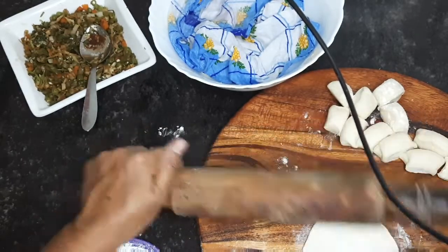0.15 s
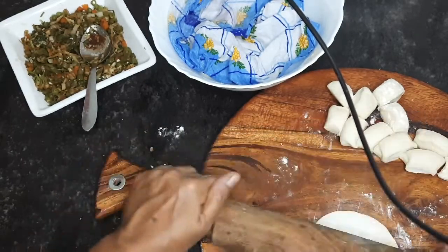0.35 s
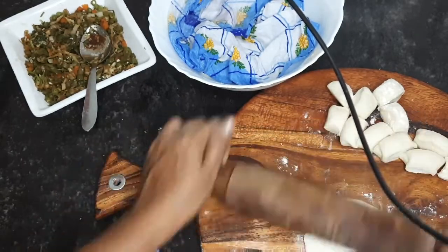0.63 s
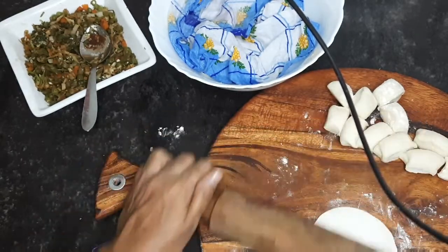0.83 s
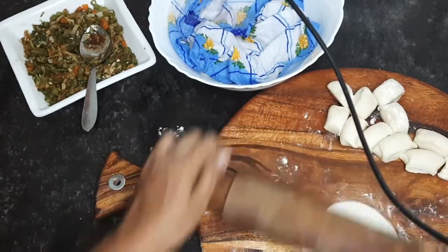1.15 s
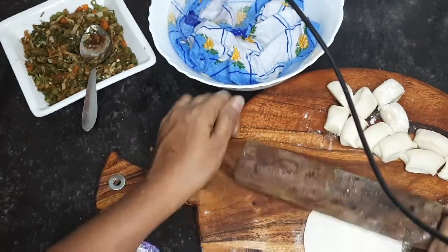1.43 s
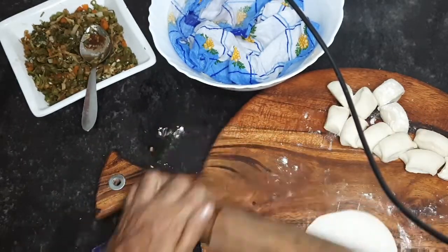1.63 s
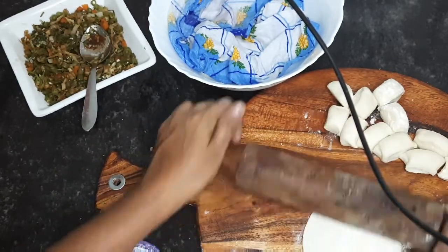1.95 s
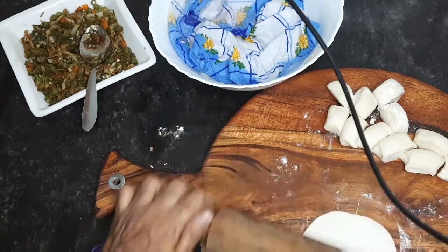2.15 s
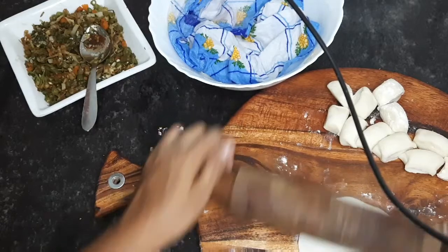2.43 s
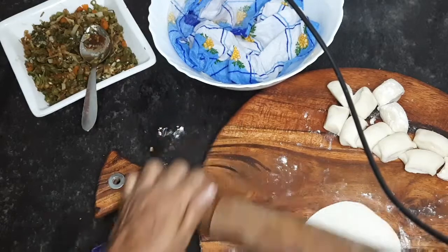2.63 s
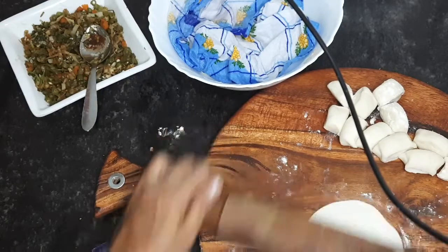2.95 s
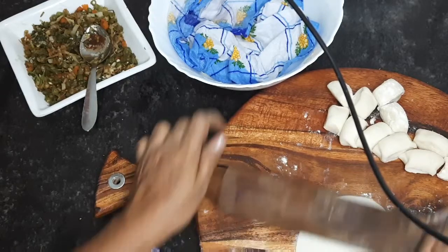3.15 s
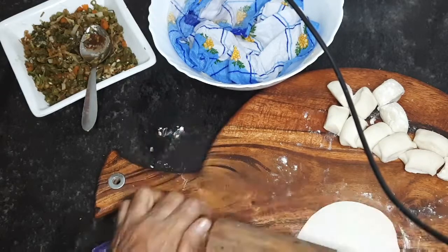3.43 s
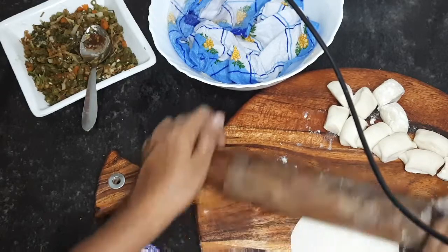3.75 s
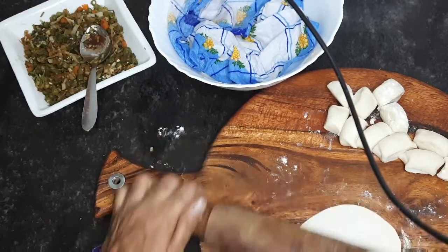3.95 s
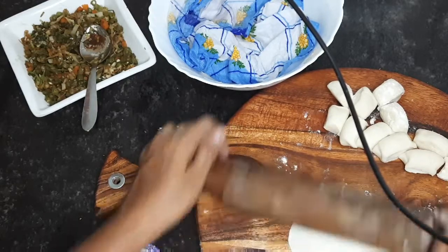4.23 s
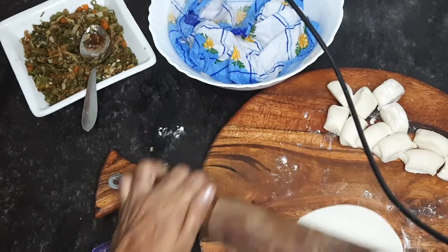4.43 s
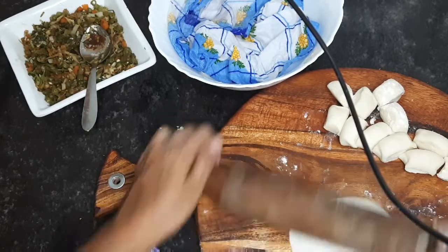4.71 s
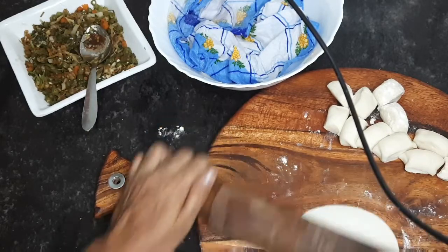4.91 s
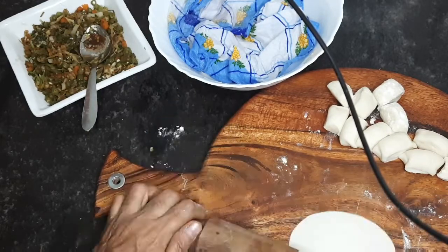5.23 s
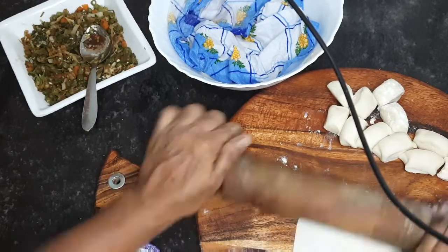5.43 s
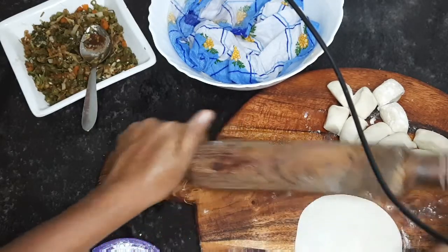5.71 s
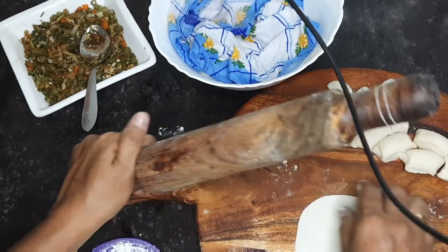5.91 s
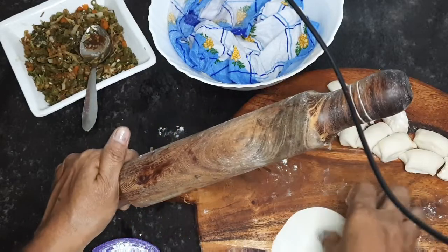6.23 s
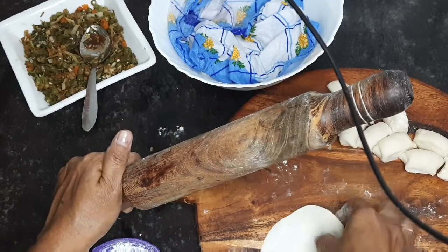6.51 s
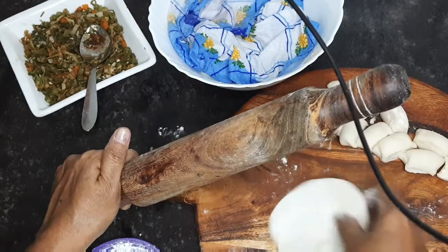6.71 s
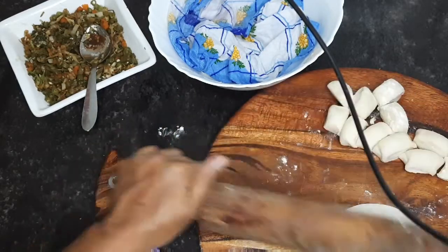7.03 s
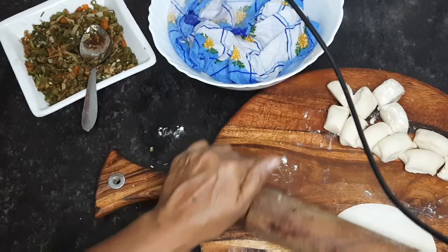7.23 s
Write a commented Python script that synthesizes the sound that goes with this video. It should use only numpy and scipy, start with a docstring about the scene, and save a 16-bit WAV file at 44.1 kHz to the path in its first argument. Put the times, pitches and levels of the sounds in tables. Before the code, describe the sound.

Close up on a kitchen counter, a heavy wooden pin knocks and rumbles across a board about every half second, with low thuds beneath and palms hissing on the handles. It is loudest in the first four seconds, then softer. Near the end only light dough handling remains over faint room noise, before one last swish.

```python
"""First come a few faint knocks and a soft rustle of hands; then a wooden rolling pin runs to and fro over dough.
It rolls on a wooden board on a kitchen counter, close to a stereo microphone. Knocks, as the pin drops off
the dough, are decaying tones of the wood; its rumble over bare wood is the same tones tapped at random,
above a low noise thud. Floury palms on the handles are shaped noise plus a hollow note.
At the end fingers slide and turn the dough. The kitchen answers the wood, over a steady room tone."""
import sys
import numpy as np
from scipy import signal
from scipy.io import wavfile
from scipy.ndimage import uniform_filter1d

SR = 44100
rng = np.random.default_rng(int(sys.argv[2]) if len(sys.argv) > 2 else 0)


def persist_wave(psi):
    """Save psi, clipped to +-1, as 16-bit WAV."""
    counts = np.round(np.clip(psi, -1, 1) * 32767).astype(np.int16)
    wavfile.write(sys.argv[1], SR, np.atleast_2d(counts).T)


N = 325017

# Blows of pin on board: t/s, peak level/dB, low tones/dB, high tones/dB, lean of the middle tones/(dB per octave)
KNOCKS = [(0.018, -40.5, 15, 21, 0.1), (0.078, -32, -5, -4, 47), (0.176, -30, -11, -3, 51),
          (0.574, -16, -3, -10, 17.5), (0.688, -3.5, -5, -19.5, -13), (1.041, -8, -11, -9.5, 16),
          (1.108, -4.5, -7, -12, -10.5), (1.473, -1.5, -12.5, -3.5, 13.5), (1.555, -28.5, -10.5, -8.5, 0.5),
          (1.884, 2.5, -8, -1.5, 13.5), (1.918, -19.5, -11, 2, 2.5), (1.982, -25, -14, -2, -6),
          (2.344, -3, -4.5, -5.5, 18.5), (2.665, -29, -7, 4, -2), (2.8, -3, -13, -3, 9),
          (2.853, -18, -9, 2.5, -2), (3.134, -35.5, -14.5, 5.5, -11.5), (3.259, -3.5, -7, -2.5, -18),
          (3.287, -23.5, -9, 2.5, -4), (3.621, -35, -8.5, 5, -6), (3.639, -19, -4.5, -8.5, -6),
          (3.731, -5.5, -7, -4.5, 4), (4.273, -25.5, -3, -22, 1), (4.738, -20, -24, -10, -12),
          (5.052, -13, -3.5, -1, -8), (5.18, -40, -9, -8, -19), (5.517, -18, -3.5, -15.5, 4),
          (5.585, -35, -6, -12, 4), (5.605, -24.5, -6, -15, 4), (5.63, -16, 8.5, -26, -19),
          (7.006, -48, -4, -12, 26)]
# Tones (modes) of board and pin: f/Hz, relative level/dB, time to die by 60 dB/s,
# phase by which the left channel leads/radians, left over right/dB
WOOD = [(320.4, -8, 0.11, .1, -0.2), (364.3, -6.5, 0.093, 0.063, 0.5), (452.6, -4.5, 0.037, .1, 1.7),
        (580, -6.5, .08, 0.054, 4.5), (623.7, 2.5, 0.06, .1, -3), (755, 3.5, 0.087, 0.074, 2),
        (780.5, 6, 0.016, 0.22, -3.5), (850, 3.5, 0.018, 0.69, 9.5), (930, -4.5, 0.023, 0.35, -10),
        (950, -9, 0.058, 0.13, -5.5), (1138, -8.5, 0.17, 1, 5.5), (1206, -2, 0.028, 0.47, -3.5),
        (1300, 0, 0.0086, 1.8, 9.5), (1451, -9.5, 0.11, 0.49, 3), (1567, -7.5, 0.041, 1.3, -6.5),
        (1618, -10, 0.2, 0.23, 2), (1680, -7, 0.14, 3.3, -11.5), (1854, -0.5, 0.027, 5.1, 6.5),
        (2165, -7.5, 0.067, 1.5, -1.5), (2494, -11, 0.038, 1.4, -4), (2543, -15.5, 0.072, 2.5, -1.5),
        (2701, -12.5, 0.05, 1.9, -4), (2864, -19.5, 0.017, 2.9, -14.5), (3350, -15, 0.011, 5.4, -7.5)]
LOW_BELOW_HZ, HIGH_ABOVE_HZ = 520, 1050
# The high tones come in close pairs, so they are listed twice
MODES_PAIRED = WOOD + [mode for mode in WOOD if mode[0] > HIGH_ABOVE_HZ]
# Runs of the pin on bare wood: full contact t/s, length of contact/s, rumble level/dB, counter thud level/dB
RUNS = [(0.57, 0.078, -49.5, -48.5), (0.702, .05, -35.5, -54.5), (1.051, 0.13, -33.5, -55),
        (1.492, 0.084, -30.5, -57), (1.891, 0.092, -33, -52), (2.352, 0.067, -30.5, -52),
        (2.679, 0.04, -38.5, -74.5), (2.816, 0.11, -31.5, -52.5), (3.143, 0.04, -41, -67.5),
        (3.263, 0.13, -32, -53.5), (3.64, 0.055, -45, -53.5), (3.742, 0.11, -32, -53),
        (4.266, 0.0089, -40, -66), (4.729, 0.027, -41.5, -59), (5.055, 0.13, -42.5, -56),
        (5.528, 0.048, -45.5, -60), (5.624, 0.056, -43.5, -64)]
# Colour of the thud through the counter: f/Hz, relative level/dB
THUD = [(30, -26.0), (60, -18.0), (86, 5.0), (107, 8.0), (135, -17.5), (190, -6), (260, -27.0), (600, -78.0)]
# Palms on handles, later fingers on dough: fastest t/s, speeding up/s, slowing down/s, hiss level/dB, hollow note level/dB
SLIDES = [(.03, 0.021, 0.043, -64.5, -56), (0.084, 0.011, 0.052, -61.5, -46),
          (0.189, 0.023, 0.095, -52, -50), (.6, 0.035, 0.16, -57, -40.5), (.74, 0.13, 0.25, -51, -57),
          (.958, 0.068, 0.08, -49, -58.5), (1.14, 0.092, 0.12, -47.5, -47), (1.38, 0.093, 0.1, -47.5, -50),
          (1.58, 0.11, 0.11, -45.5, -47), (1.83, 0.076, 0.11, -44.5, -48.5),
          (2.01, 0.13, .13, -45.5, -43.5), (2.27, 0.069, .08, -45, -44.5), (2.45, 0.13, 0.14, -45.5, -43),
          (2.7, 0.062, 0.085, -43, -47), (2.92, 0.14, .12, -45.5, -47), (3.16, 0.066, 0.086, -44, -42),
          (3.39, 0.15, .11, -45.5, -46.5), (3.641, 0.064, 0.097, -44, -36), (3.85, 0.11, .1, -44, -43.5),
          (4.09, 0.087, 0.083, -46.5, -49), (4.3, 0.094, 0.1, -46.5, -46), (4.54, 0.09, 0.078, -46, -45.5),
          (4.75, 0.1, 0.15, -46, -44.5), (4.981, 0.084, 0.089, -45, -46), (5.2, 0.13, 0.11, -46.5, -45),
          (5.441, 0.091, 0.1, -47, -54.5), (5.67, 0.12, .12, -44.5, -45),
          (5.829, 0.028, 0.093, -61.5, -69.5), (6.07, 0.1, 0.2, -65.5, -74.5),
          (6.236, 0.071, 0.092, -61.5, -56.5), (6.325, 0.035, 0.064, -59.5, -49),
          (6.451, 0.049, 0.032, -76, -57), (6.506, 0.013, 0.033, -57.5, -45.5),
          (6.56, 0.075, 0.064, -56, -47.5), (6.645, 0.022, 0.043, -63, -52.5),
          (6.684, 0.019, 0.031, -62.5, -48), (6.839, 0.043, 0.098, -60, -60),
          (7.016, 0.084, 0.092, -54.5, -54.5)]
# Colour of the hiss of floury skin: f/Hz, relative level per Hz/dB
HISS = [(650, -35.5), (1100, -14), (1410, -3.5), (1780, -8), (2100, -1.5), (2360, -6), (3460, -7),
        (4640, -8), (12100, -11), (13300, -12.5)]
# Peaks added to that hiss: f/Hz, width/Hz, lift/dB
HISS_PEAKS = [(1320, 370, 4), (2135, 26, 10), (2730, 140, 2), (3340, 270, 6.5), (4800, 480, 2.5),
              (8640, 280, 5)]
# Air between board and counter, heard as a hollow note: f/Hz, width/Hz, relative level/dB
HOLLOW = [(863, 96, 1.5), (931.3, 33, 0), (986, 36, 0)]
# Fading of the kitchen's answer: f/Hz, time to die by 60 dB/s
KITCHEN = [(200, 0.47), (800, 0.28), (2500, 0.43), (8000, 0.34)]
# Colour of the room tone: f/Hz, relative level per Hz/dB
ROOM_TONE = [(12, -50), (20, -21), (43, -4.5), (128, -0.5), (203, -10), (239, -6.5), (322, -7.5),
             (350, -9.5), (472, -12), (572, -16), (5800, -35), (7410, -25), (13500, -44.5)]
# Likeness of left and right: f/Hz, likeness (0 = unrelated, 1 = the same)
SAME = [(30, .3), (100, 0.15), (300, 0.38), (900, 0.14), (2000, 0.14), (13000, 0.056)]

TICK_DB = -31  # tick under its blow
CONTACT_DB_PER_S, SAG_DB_PER_S, LIFT_DB_PER_S = 1500.5, 31.5, 208  # rumble sets in, sags, dies as the pin climbs the dough
THUD_LATE_S = 0.024  # the counter answers late
THUD_RISE_DB_PER_S, THUD_SAG_DB_PER_S, THUD_FALL_DB_PER_S = 600, 56, 158
ON_DOUGH_DB = -16  # faint rumble under the hiss of every stroke
EASE_DB, HOLLOW_EASE_DB = 13.5, 18  # drop at either end of a slide: hiss, hollow note
EASE_SHAPE = 1.74  # how round the arch of a slide is
RESTING_DB = -83  # hiss of hands nearly at rest
KITCHEN_DB, ROOM_TONE_DB = -9.0, -66.5
CEILING = 0.65  # the microphone rounds off peaks that come near this amplitude
EDGE_HZ = 13330  # upper band limit


def knocks():
    """Each blow swells for a few ms while the pin settles, rings the wood, ticks at its height and chatters after."""
    out = np.zeros((2, N + SR))
    t = np.arange(SR // 10) / SR
    rise_s = 0.0046
    tick_band = signal.butter(2, [2800, 11500], "bandpass", fs=SR, output="sos")
    for s, db, low_db, high_db, lean_db in KNOCKS:
        spot = rng.standard_normal((4, len(MODES_PAIRED), 1))
        body = ring(t, low_db, high_db, lean_db, spot, rise_s) * (1 - t / t[-1])
        body = gain_of(db) * body / abs(body).max()

        tick_shape = np.minimum(t / rise_s, 1) ** 3 * gain_of(-60 * np.maximum(t - rise_s, 0) / 0.025)
        tick = signal.sosfilt(tick_band, rng.standard_normal((2, len(t))) * tick_shape)
        tick = gain_of(db + TICK_DB) * tick

        # contact begins softly 3 ms early; three rebounds follow at uneven gaps near 9 ms, each weaker
        gaps_s = 0.009 * np.exp(0.3 * rng.standard_normal(3))
        starts_s = s + np.cumsum([-0.003, *gaps_s])
        rebounds = np.sign(rng.standard_normal(3)) * gain_of(-11.5 - 3.7 * np.arange(3))
        for start_s, gain in zip(starts_s, [1, *rebounds]):
            at = round(start_s * SR)
            # the tick weakens twice over, so the rebounds are duller
            out[:, at:at + len(t)] += gain * (body + abs(gain) * tick)
    return out[:, :N]


def ring(t, low_db, high_db, lean_db, draw, rise_s):
    """The wood's tones in stereo: each swells for rise_s, the high ones longer, then dies.
    Where pin and hands rest (draw) shifts each tone's phase, strength, pitch and side a little."""
    hz, db, t60, lead, pan_db = np.transpose(MODES_PAIRED)[:, :, None]
    low, high = hz < LOW_BELOW_HZ, hz > HIGH_ABOVE_HZ
    # high tones change most from spot to spot
    phase_draw, level_draw, pitch_draw, side_draw = np.linspace(0.3, 1, len(hz))[:, None] * draw

    top_s = rise_s * (1 + 0.51 * high)
    swell = np.minimum(t / top_s, 1) ** 1.6
    fade_db = -60 * np.maximum(t - top_s, 0) / t60

    middle_db = lean_db * np.log2(hz / 780)
    group_db = np.where(low, low_db, np.where(high, high_db, middle_db))
    level_db = db + group_db + 2.0 * level_draw

    side = np.array([0.5, -0.5])[:, None, None]  # left, right
    turning = 2 * np.pi * hz * (1 + 0.033 * pitch_draw) * (t - rise_s)
    phase = turning + np.pi + 2.16 * phase_draw + side * (lead + 2.18 * side_draw)
    tones = swell * gain_of(level_db + side * pan_db + fade_db) * np.cos(phase)
    return tones.sum(1)


def rolling():
    """Bumps in the grain tap the wood in quick uneven succession; the counter thuds below."""
    t = np.arange(SR // 8) / SR
    body = np.zeros((2, N))
    for _ in range(5):  # five spots on the wood, each tapped on its own
        spot = rng.standard_normal((4, len(MODES_PAIRED), 1))
        tap = ring(t, 5.2, -6.5, -1.5, spot, rise_s=0.002933)
        body += signal.oaconvolve(grains(130, 2.8)[None], tap, axes=1)[:, :N]
    on_wood = contact(0, column=2, rise=CONTACT_DB_PER_S, sag=SAG_DB_PER_S, fall=LIFT_DB_PER_S)
    on_dough = gain_of(ON_DOUGH_DB) * strokes(column=3, ease_db=EASE_DB)

    thud = noise(lambda hz: read(THUD, hz), 2.0, 2.4, size=2048)
    thud = evened(thud + 0.18 * thud[::-1])  # mixing in the other channel makes the two more alike
    thud_gain = contact(THUD_LATE_S, column=3, rise=THUD_RISE_DB_PER_S, sag=THUD_SAG_DB_PER_S,
                        fall=THUD_FALL_DB_PER_S)
    return evened(body) * (on_wood + on_dough) + thud * thud_gain


def contact(late_s, column, rise, sag, fall):
    """Loudness of one column of RUNS: a rise to full contact, a sag along the run, a fall after it (dB per s)."""
    t, power = np.arange(N) / SR, 0
    for row in RUNS:
        since = t - row[0] - late_s
        lasts_s = row[1]
        db = row[column] + rise * np.minimum(since, 0)
        db = db - sag * np.clip(since, 0, lasts_s)
        db = db - fall * np.maximum(since - lasts_s, 0)
        power = power + gain_of(2 * db)
    return np.sqrt(power)


def sliding():
    """Floury skin hisses, grittier where it catches; the rubbing also sounds a hollow note in small lumps."""
    def hiss_db(hz):
        """The smooth hiss colour with its peaks on top."""
        lift = sum(db / (1 + (2 * (hz - f) / width) ** 2) for f, width, db in HISS_PEAKS)
        return read(HISS, hz) + lift

    hiss = noise(hiss_db, 2.8, 0.49)
    # each grain of flour drags for 3 ms
    catches = np.sqrt(abs(uniform_filter1d(grains(400, 2.0) ** 2, size=130)))
    hiss = evened(hiss * (1 + 0.11 * catches))

    t, note = np.arange(SR // 10) / SR, 0
    side_phase, side_gain = np.array([[0.3], [-0.3]]), gain_of([[0.7], [-0.7]])  # left, right
    for hz, width, db in HOLLOW:
        fade = np.exp(-np.pi * width * t) * np.minimum(t / 0.0021, 1)
        lump = side_gain * fade * np.sin(2 * np.pi * hz * t + side_phase)
        note = note + gain_of(db) * signal.oaconvolve(grains(130, 3.44)[None], lump, axes=1)[:, :N]

    hiss_gain = strokes(column=3, ease_db=EASE_DB) + gain_of(RESTING_DB)
    return hiss * hiss_gain + evened(note) * strokes(column=4, ease_db=HOLLOW_EASE_DB)


def strokes(column, ease_db):
    """Loudness of one column of SLIDES: each slide is an arch, loudest where the hand is fastest."""
    t, power = np.arange(N) / SR, 0
    for row in SLIDES:
        # 0 at the fastest moment, 1 at either end
        away = np.maximum((row[0] - t) / row[1], (t - row[0]) / row[2])
        db = row[column] - ease_db * np.minimum(away, 10) ** EASE_SHAPE
        power = power + gain_of(2 * db)
    return np.sqrt(power)


def kitchen(x):
    """The room's answer: sparse taps of random sign, each band dying at its own speed, left and right partly alike."""
    taps = np.zeros((2, SR // 2))
    at = np.arange(200, SR // 2 - 20, 20)
    at = at + rng.integers(0, 20, (2, len(at)))  # one tap somewhere in every 20 samples
    np.put_along_axis(taps, at, rng.choice([-1., 1.], at.shape), 1)
    hz, t, (left, other) = signal.stft(taps, SR, nperseg=256)
    fade = gain_of(-60 * t / read(KITCHEN, hz)[:, None])
    tail = signal.istft(stereo(left, other, hz) * fade, SR, nperseg=256)[1]
    return signal.oaconvolve(x, tail / np.linalg.norm(tail[0]), axes=1)[:, :N]


def room_tone():
    """Steady background noise of the room, a little stronger on the left."""
    level = gain_of(ROOM_TONE_DB + np.array([[1.1], [-1.1]]))
    return level * noise(lambda hz: read(ROOM_TONE, hz), 1.9, 0.44, size=2048)


def noise(shape_db, patchy_db, flicker_db, size=512):
    """Stereo noise of the colour shape_db(hz), with drifting patches and a flicker shared by all bands."""
    frames, hz = 4 * N // size + 5, np.fft.rfftfreq(size, 1 / SR)
    a, b, c, d, patches = rng.standard_normal((frames, len(hz), 5)).T
    flicker = evened(uniform_filter1d(patches[0], size=3))
    patches = uniform_filter1d(patches, size=5, axis=0)  # smooth over pitch, then over time
    patches = evened(uniform_filter1d(patches, size=10, axis=1))
    z = stereo(a + 1j * b, c + 1j * d, hz)
    z *= gain_of(shape_db(hz)[:, None] + patchy_db * patches + flicker_db * flicker)
    return evened(signal.istft(z, nperseg=size, noverlap=3 * size // 4)[1][:, :N])


def stereo(left, other, hz):
    """Builds the right channel from the left and an unrelated sound, as alike in each band as SAME says."""
    same = np.clip(read(SAME, hz), -1, 1)[:, None]
    return np.array([left, same * left + np.sqrt(1 - same ** 2) * other])


def grains(per_s, spread_db):
    """Random clicks of either sign, a few of them large."""
    size = gain_of(spread_db * np.minimum(rng.exponential(1, N), 4)) * rng.choice([-1., 1.], N)
    return evened(size * (rng.random(N) < per_s / SR))


def read(points, hz):
    """Reads a table between its points, with frequency on a log axis."""
    f, value = np.transpose(points)
    return np.interp(np.log(hz + 1), np.log(f + 1), value)


def evened(x):
    """Scales to an rms (average strength) of 1."""
    return x / np.sqrt(np.mean(x ** 2) + 1e-20)


def gain_of(db):
    """Turns decibels into amplitude."""
    return 10 ** (np.asarray(db) / 20)


def scene():
    """All sources, the kitchen's answer to the wood, and the room tone."""
    wood = knocks() + rolling()
    return wood + sliding() + gain_of(KITCHEN_DB) * kitchen(wood) + room_tone()


def record(dry):
    """Soft overload on the hardest knocks, then the band limit."""
    soft = CEILING * np.tanh(dry / CEILING)
    low_pass = signal.firwin(511, EDGE_HZ, window=("kaiser", 9), fs=SR)
    return signal.oaconvolve(soft, low_pass[None], "same")


dry = scene()
out = record(dry)
persist_wave(out)
```